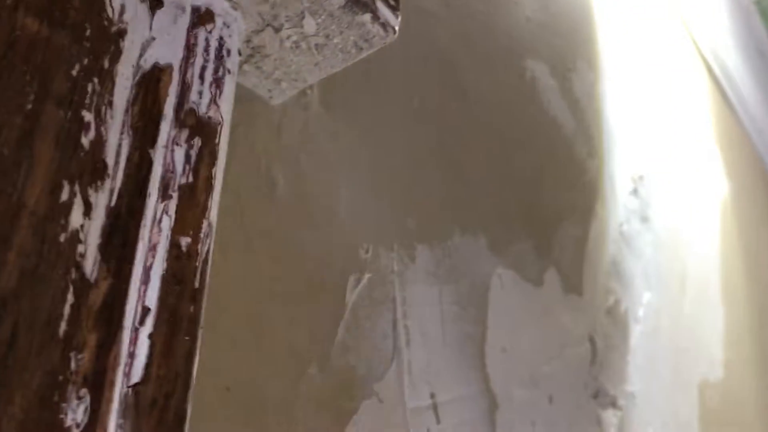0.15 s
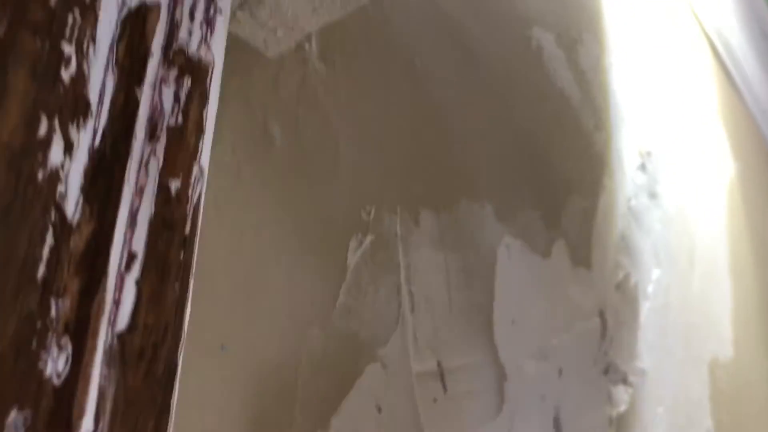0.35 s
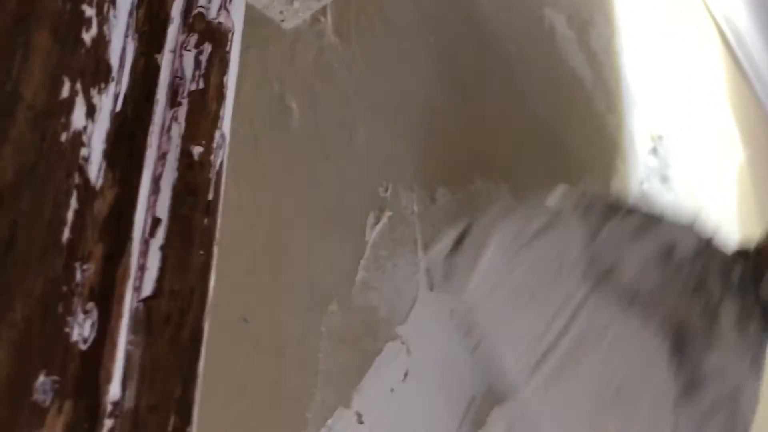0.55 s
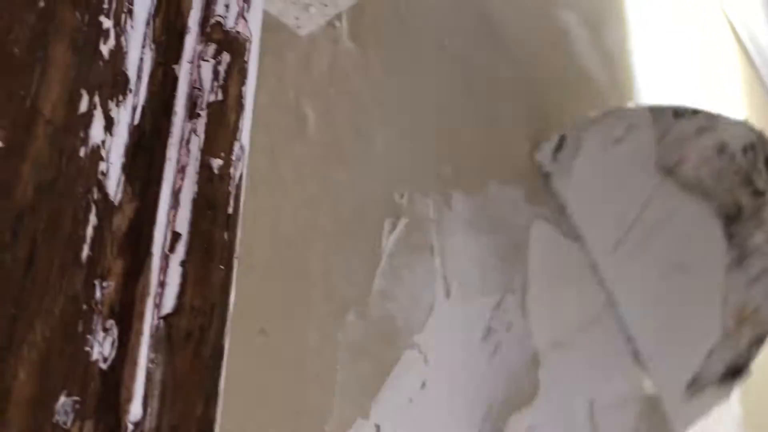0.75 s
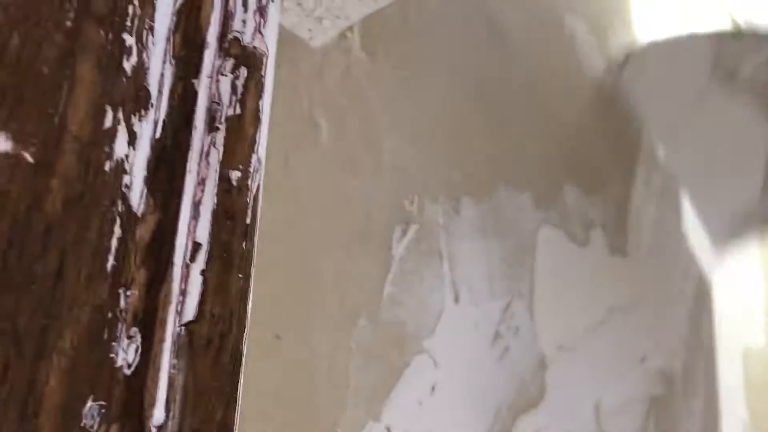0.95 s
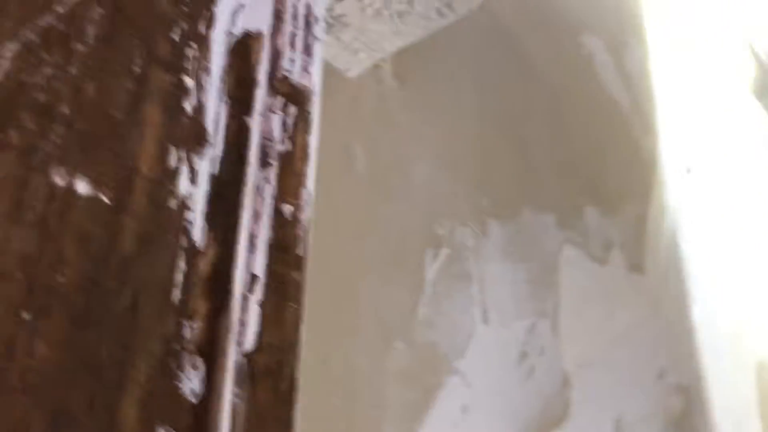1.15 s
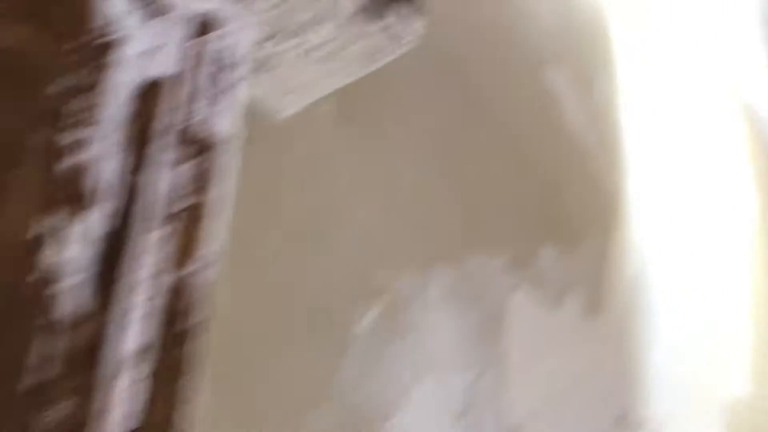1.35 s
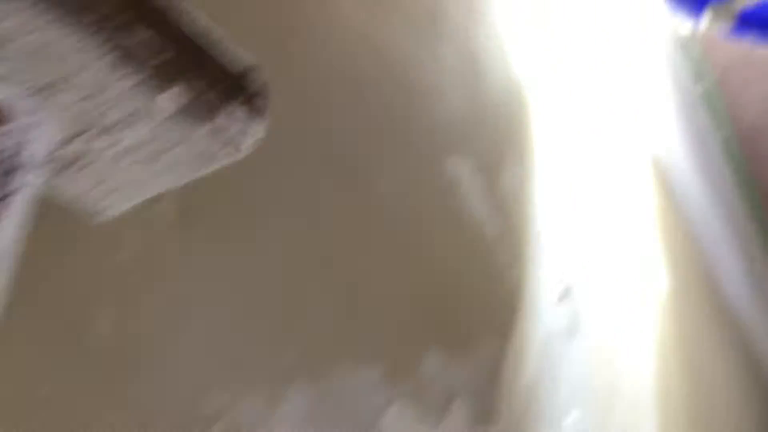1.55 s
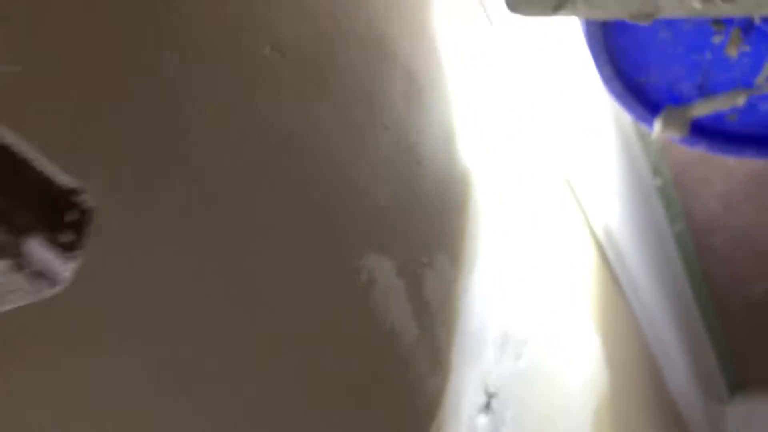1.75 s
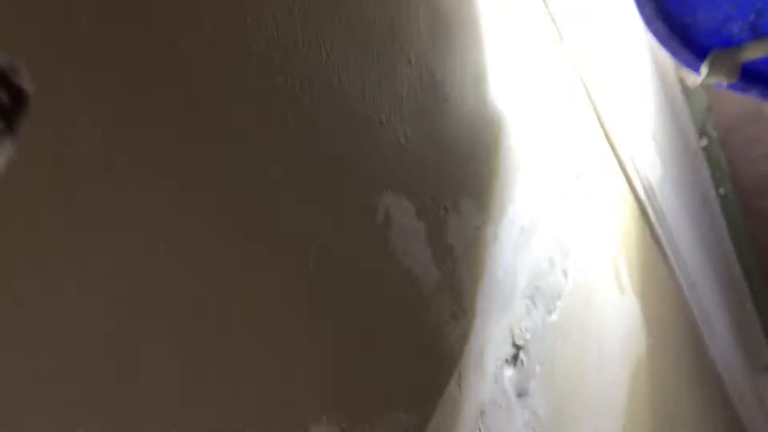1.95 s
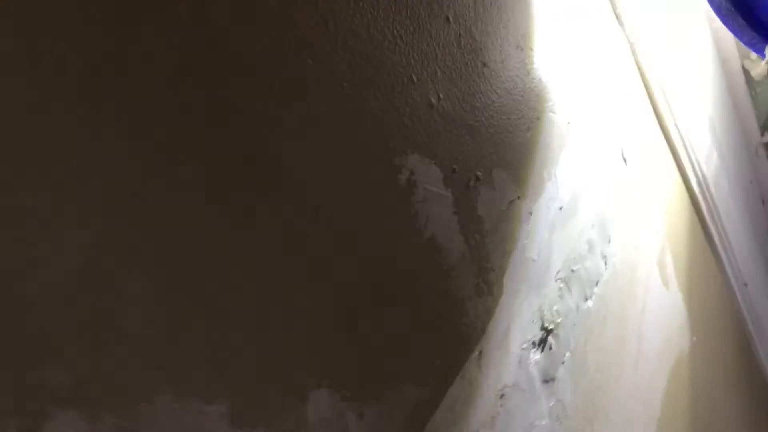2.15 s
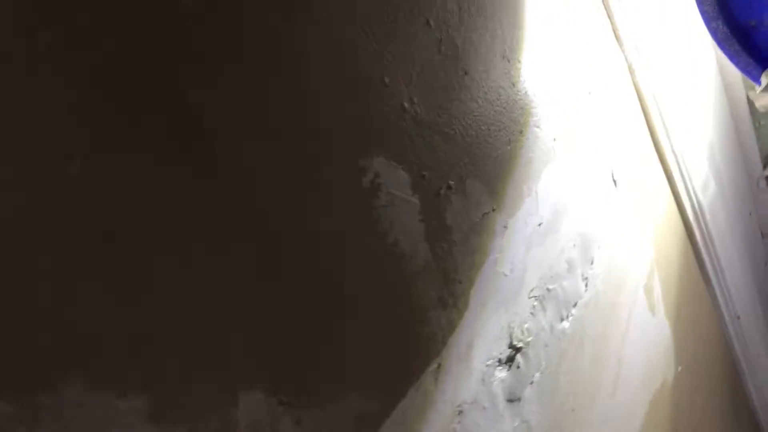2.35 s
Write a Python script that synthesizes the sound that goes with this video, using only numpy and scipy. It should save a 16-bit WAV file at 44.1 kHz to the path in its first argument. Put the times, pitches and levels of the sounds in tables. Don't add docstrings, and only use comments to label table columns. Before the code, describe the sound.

A filling blade clacks on a plaster wall, then scrapes gritty wet filler and rasps off dry.

```python
import sys
import numpy as np
from scipy import signal
from scipy.fft import rfft, irfft, next_fast_len
from scipy.io import wavfile
from scipy.ndimage import uniform_filter1d, map_coordinates

SR = 44100
rng = np.random.default_rng(int(sys.argv[2]) if len(sys.argv) > 2 else 0)


def log_audio(samples):
    frames = np.atleast_2d(samples).T
    limited = np.clip(frames, -1, 1)
    pcm = np.round(limited * 32767).astype(np.int16)
    wavfile.write(sys.argv[1], SR, pcm)


def gain_from_decibels(decibels):
    exponent = np.asarray(decibels, float) / 20
    return 10 ** exponent


N = 110250


# (time [s], pressure [dB], paste hiss over it [dB])
WET_PUSHES = [
    [(.25, -49.5, -8), (.316, -46, -15), (.345, -37.5, -8.5), (.392, -29.5, -7.5), (.45, -31, -4.5),
     (.485, -30, -3), (.51, -29.5, -12.5), (.54, -37, -1.5), (.555, -39.5, -3)],
    [(.555, -32.5, -11.5), (.585, -33.5, -9), (.625, -30.5, -7), (.69, -31.5, -9), (.72, -27.5, -7.5),
     (.766, -30, -9.5), (.81, -33.5, -10), (.9, -37.5, -8.5), (.97, -38.5, -7.5)],
]
# (frequency [Hz], width [Hz], level [dB])
FIRST_PUSH_BLADE = [(316, 140, -10.5), (934, 440, -2), (1330, 315, 2.5), (1790, 490, -2), (2325, 270, 1),
                    (3160, 650, -8), (4000, 790, -6.5)]
# (frequency [Hz], width [Hz], level [dB])
SECOND_PUSH_BLADE = [(302, 190, -6.5), (886, 267, 0), (1460, 430, -1.5), (1780, 220, 0), (2245, 270, 0),
                     (3500, 420, -10.5)]
# (frequency [Hz], level per Hz [dB])
PASTE_HISS = [(1500, -28), (3000, -5), (4500, -11.5), (6000, -8.5), (7700, -15), (9300, -12), (12500, -13),
              (15500, -14)]


def wet_drag():
    first = slide(WET_PUSHES[0], FIRST_PUSH_BLADE, 5060, PASTE_HISS, hiss_db=0.9)
    second = slide(WET_PUSHES[1], SECOND_PUSH_BLADE, 3400, PASTE_HISS, hiss_db=2.26)
    return first + second


# (time [s], pressure [dB], dust hiss over it [dB])
DRY_STROKES = [
    [(.968, -38.5, -12), (.99, -31, -9), (1.008, -23.5, -11.5), (1.035, -22.5, -14), (1.048, -22, -15),
     (1.06, -23, -16.5), (1.073, -23.5, -14)],
    [(1.073, -22.5, -14), (1.085, -20.5, -17.5), (1.118, -21.5, -16.5), (1.13, -36, -13)],
]
# (frequency [Hz], width [Hz], level [dB])
BITING_BLADE = [(345, 320, -17.5), (845, 230, -7), (1045, 86, -1.5), (1260, 88, 3.5), (1790, 300, -6),
                (2245, 230, -1), (2595, 270, -9)]
# (frequency [Hz], width [Hz], level [dB])
LEAVING_BLADE = [(336, 670, -12), (1034, 126, -2), (1241, 46, 0.5), (1460, 170, -6.5), (1760, 170, -4),
                 (2230, 270, -4.5), (2580, 255, -5.5)]
# (frequency [Hz], level per Hz [dB])
DUST_HISS = [(1500, -20), (3000, -5.5), (3700, -2.5), (4550, -6), (6000, -6.5), (8700, -8), (12000, -12.5),
             (15500, -22)]


def dry_rasp():
    bite = slide(DRY_STROKES[0], BITING_BLADE, 2740, DUST_HISS, hiss_db=1.5)
    leave = slide(DRY_STROKES[1], LEAVING_BLADE, 2740, DUST_HISS, hiss_db=3.0)
    return bite + leave


# (time [s], peak level [dB])
SNAG_HITS = [
    (.338, -23),
    (.667, -20),
    (.7185, -17),
    (.7445, -15),
    (.979, -23),
    (1.0788, -13),
    (1.0845, -12),
    (1.0895, -13),
    (1.1125, -10),
]


def slide(rows, blade, edge_hz, spectrum, hiss_db):
    press_db, hiss_over_db, gate = curves(rows)
    low = drag_rumble(press_db)
    press_db = press_db + 1.5 * (wobble(44.86) + 0.2 * wobble(170))

    def ring(f):
        rolloff = 1 + 1j * 1.21 * f / edge_hz - (f / edge_hz) ** 2
        return body(blade, f) / rolloff ** 2

    def snag_response(f):
        return (ring(f) + .008) * 1j * f / (900 + 1j * f)

    chatter = unit(filtered(patchy(grit(), patchy_db=1.58), ring))
    hiss = rush(spectrum, patchy_db=2.5) * gain_from_decibels(1.05 * wobble(300))
    out = gate * (gain_from_decibels(press_db) * (chatter + gain_from_decibels(hiss_over_db + hiss_db) * hiss) + low)

    t = np.arange(2048) / SR
    snag_t60 = 0.0076
    for s, db in SNAG_HITS:
        start = round(s * SR)
        kick = filtered(rng.standard_normal(len(t)) * gain_from_decibels(-60 * t / snag_t60), snag_response)
        out[start:][:len(t)] += gate[start] * gain_from_decibels(db) * kick / abs(kick).max()
    return out


def grit():
    grains_per_s, spread_db = 7000, 3.2
    chance, size, side = rng.random((3, N))
    sizes = gain_from_decibels(-spread_db * np.log(size + 0.0077))
    grains = (chance < grains_per_s / SR) * sizes * np.sign(side - .5)
    return unit(grains) + 0.91 * rng.standard_normal(N)


# (frequency [Hz], level per Hz [dB])
DRAG_RUMBLE = [(30, -47), (50, -4), (130, -5.5), (300, -13), (600, -22.5)]


def drag_rumble(press_db):
    return gain_from_decibels(-48.5 + 0.16 * (press_db + 37)) * rush(DRAG_RUMBLE, patchy_db=2.0)


# (time [s], peak level [dB], brightness [dB per octave], t60 [s])
CONTACTS = [
    (0.1625, -28.5, -7.5, 0.047),
    (0.2127, -33, -3, 0.01),
    (0.221, -29.5, -12, 0.047),
    (0.2401, -3.5, -1, 0.0077),
    (0.2427, -20, -5, 0.037),
    (0.248, -21.5, -3.5, 0.098),
]
# (frequency [Hz], width [Hz], level [dB])
CLACK_BODY = [(138, 92, 3.5), (377, 120, 3.5), (1087, 326, 6.5), (2300, 2270, 2.5), (3960, 1230, 4),
              (5500, 910, -2.5), (9100, 3000, -30), (13000, 2300, -16)]


def taps():
    out = np.zeros(N)
    t = np.arange(4096) / SR
    for s, db, tilt_db, t60 in CONTACTS:
        burst = rng.standard_normal(len(t)) * gain_from_decibels(-60 * t / t60)
        burst[0] = 6
        hit = filtered(burst, lambda f: (body(CLACK_BODY, f) + 0.14) * (1 + 1j * f / 1000) ** (tilt_db / 6))
        out[round(s * SR):][:len(t)] += gain_from_decibels(db) * hit / abs(hit).max()
    return out


# (time [s], frequency [Hz], level [dB], t60 [s])
WALL_THUD = (0.1705, 55, -24.5, .14)


def thud():
    s, hz, db, t60 = WALL_THUD
    u = since(s)
    onset = 1 - np.exp(-u / 0.011)
    return gain_from_decibels(db - 60 * u / t60) * np.sin(2 * np.pi * hz * u) * onset


# (time [s], speed as level [dB])
SLEEVE_MOVES = [
    [(1.38, -83), (1.47, -68), (1.505, -66), (1.518, -55), (1.55, -57), (1.585, -63.5), (1.655, -60)],
    [(1.655, -59), (1.673, -44), (1.691, -37), (1.715, -41.5), (1.763, -47), (1.843, -50.5), (2.0, -57),
     (2.2, -61.5), (2.5, -64)],
]
# (frequency [Hz], level per Hz [dB])
CLOTH_HISS = [(150, -16), (300, -3), (1000, -0.5), (2500, -0.5), (4500, -3), (6300, 0.5), (9000, -3.5),
              (15500, -6)]


def sleeve():
    speed_db, gate = curves(SLEEVE_MOVES[0] + SLEEVE_MOVES[1][1:])
    return gate * gain_from_decibels(speed_db + 2.5 + 1.1 * wobble(90)) * rush(CLOTH_HISS, patchy_db=1.26)


# (time [s], level [dB], frequency [Hz], t60 [s])
GRIT_TICKS = [
    (.162, -45, 10100, 0.014),
    (0.2204, -43.5, 13400, .012),
    (2.001, -45, 6200, 0.011),
    (2.481, -52.5, 6000, .025),
]


def ticks():
    out = np.zeros(N)
    for s, db, hz, t60 in GRIT_TICKS:
        u = since(s)
        noise = unit(filtered(rng.standard_normal(N), lambda f: body([(hz, 0.28 * hz, 0)], f) ** 2))
        out += gain_from_decibels(db) * noise * gain_from_decibels(-60 * u / t60) * (u > 0)
    return out


# (time [s], pitch [Hz], level [dB])
SQUEAK_GLIDE = [(2.415, 1380, -75), (2.428, 1410, -59), (2.437, 1450, -68), (2.447, 1570, -61),
                (2.464, 1640, -58), (2.478, 1670, -62), (2.5, 1665, -53)]


def squeak():
    hz, db, gate = curves(SQUEAK_GLIDE)
    phase = 2 * np.pi * np.cumsum(hz + 25 * wobble(150)) / SR
    return gate * gain_from_decibels(db + 1.8 * wobble(60)) * np.sin(phase) * 1.1


# (frequency [Hz], t60 [s])
ROOM_DECAY = [(150, 0.96), (1000, 0.68), (2500, .7), (5000, 0.65), (12000, 0.27)]


def room(x):
    hz, t, z = signal.stft(rng.standard_normal(SR), SR, nperseg=256)
    decay = gain_from_decibels(-60 * t / along(ROOM_DECAY, hz)[:, None])
    tail = signal.istft(z * decay, SR, nperseg=256)[1]
    late = np.pad(x, (300, 0))
    return signal.fftconvolve(late, tail / np.linalg.norm(tail))[:N]


# (frequency [Hz], level per Hz [dB])
RUMBLE = [(30, -32), (50, 0.5), (90, -3), (200, -12.5), (450, -22), (1200, -23), (3000, -34.5),
          (15500, -47)]


def rumble():
    return gain_from_decibels(-52 + 0.27 * wobble(4.82)) * rush(RUMBLE, patchy_db=1.7)


def unit(x):
    return x / np.sqrt(np.mean(x ** 2) + 1e-20)


def since(s):
    return np.clip(np.arange(N) / SR - s, 0, None)


def along(points, hz):
    f, v = np.transpose(points)
    return np.interp(np.log(hz + 1), np.log(f + 1), v)


def curves(rows):
    s, *cols = np.transpose(rows)
    t = np.arange(N) / SR
    inside = np.minimum(t - s[0], s[-1] - t)
    gate = np.clip(inside / .006 + .5, 0, 1) ** .5
    return [np.interp(t, s, c) for c in cols] + [gate]


def wobble(rate):
    knots = rng.standard_normal(int(N * rate / SR) + 4)
    return map_coordinates(knots, [np.arange(N) * rate / SR])


def filtered(x, response):
    m = next_fast_len(len(x) + 8192)
    return irfft(rfft(x, m) * response(np.fft.rfftfreq(m, 1 / SR)), m)[:len(x)]


def body(peaks, f):
    return sum((-1) ** k * gain_from_decibels(db) * 1j * f * w / (c * c - f * f + 1j * f * w)
               for k, (c, w, db) in enumerate(peaks))


def patchy(x, patchy_db):
    z = signal.stft(x, nperseg=512)[2]
    field = uniform_filter1d(rng.standard_normal(z.shape), 8, 0)
    field = uniform_filter1d(field, 8, 1)
    return signal.istft(z * gain_from_decibels(patchy_db * unit(field)), nperseg=512)[1][:N]


def rush(spectrum, patchy_db):
    noise = patchy(rng.standard_normal(N), patchy_db)
    return unit(filtered(noise, lambda hz: gain_from_decibels(along(spectrum, hz))))


def scene():
    blade = wet_drag() + dry_rasp() + taps() + thud()
    reflections = gain_from_decibels(-14) * room(blade)
    return (blade + reflections + sleeve() + ticks() + squeak() + rumble())[None]


def top_cut(x):
    return signal.sosfilt(signal.butter(12, 16790, fs=SR, output="sos"), x)


# (centre [Hz], width [Hz], depth [0-1])
MIC_NOTCH = (10410, 560, 0.4)


def record(dry):
    centre_hz, width_hz, depth = MIC_NOTCH
    top_hz = 15750

    def mic(hz):
        dip = 1 - depth * np.exp(-((hz - centre_hz) / width_hz) ** 2)
        return dip * gain_from_decibels(-60 * np.clip((hz - top_hz) / 110 + .5, 0, 2) ** 2)

    mix = filtered(dry[0], mic)[None]
    return top_cut(mix)


dry = scene()
out = record(dry)
log_audio(out)
```